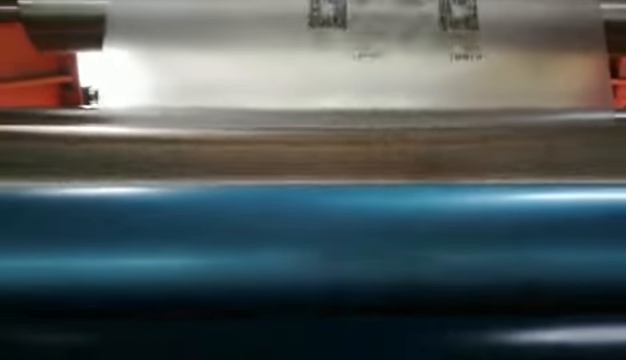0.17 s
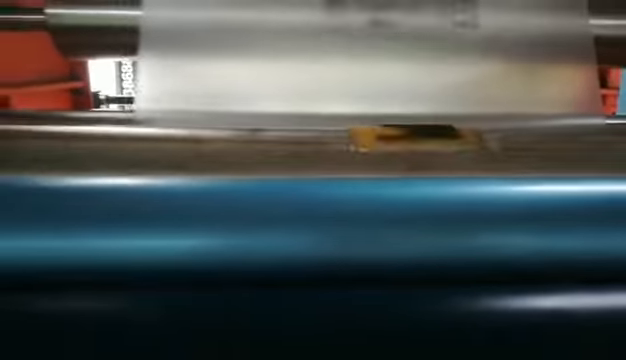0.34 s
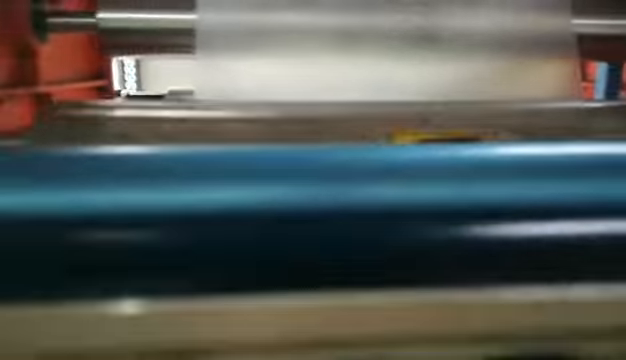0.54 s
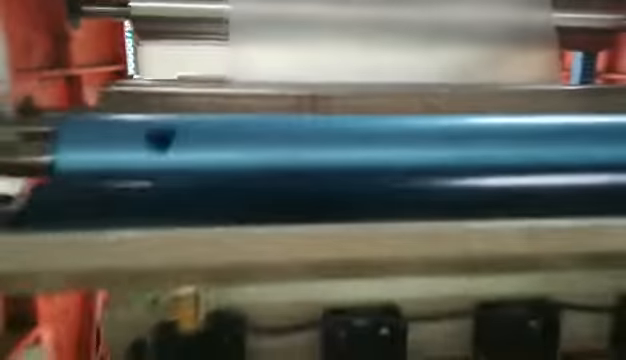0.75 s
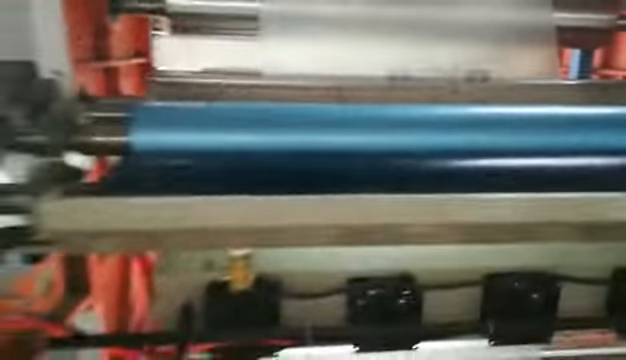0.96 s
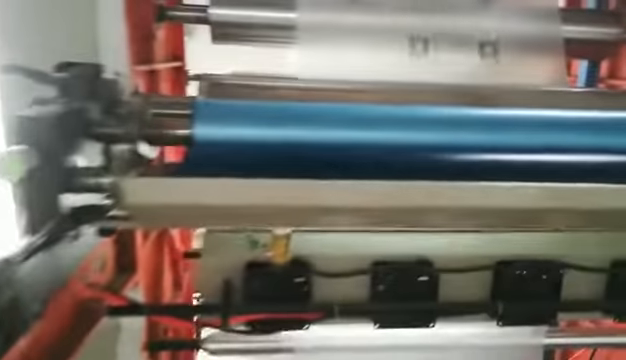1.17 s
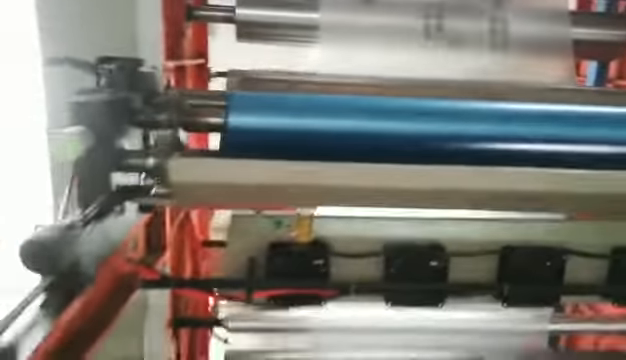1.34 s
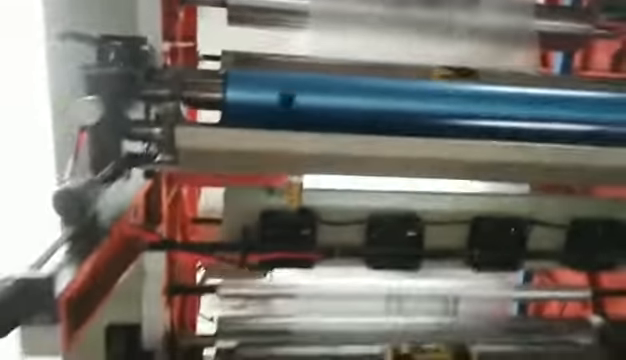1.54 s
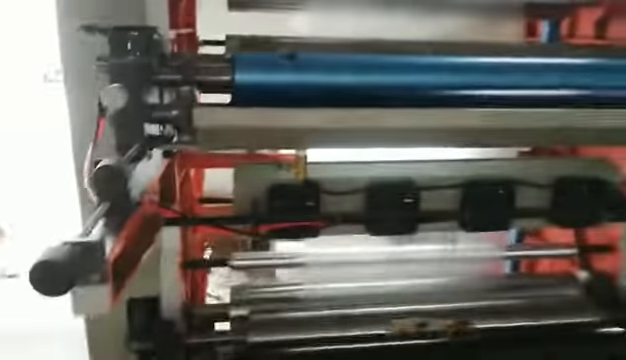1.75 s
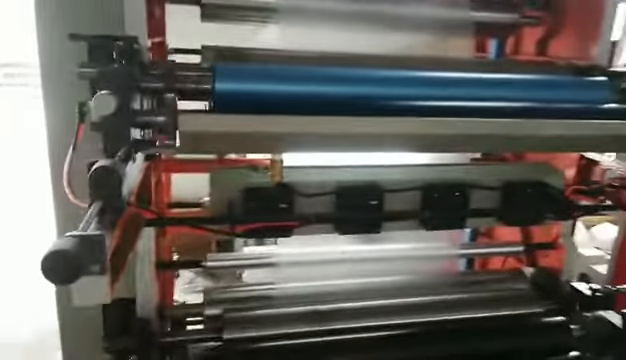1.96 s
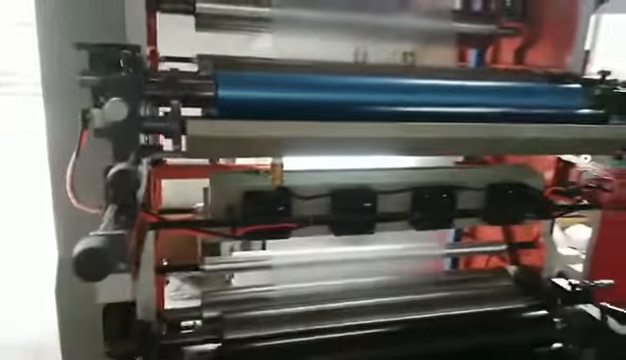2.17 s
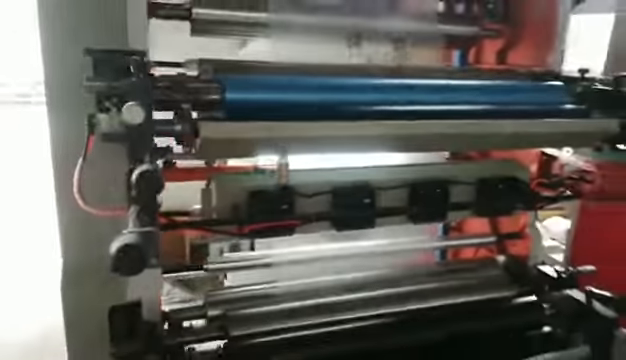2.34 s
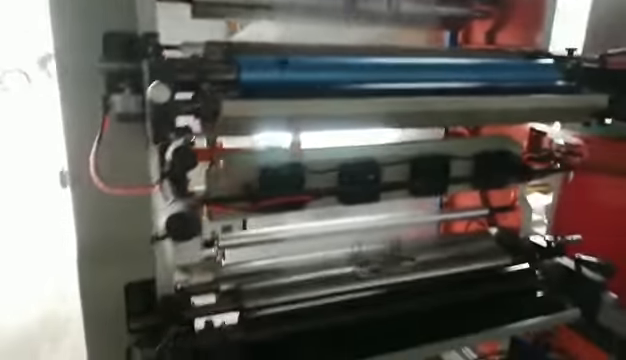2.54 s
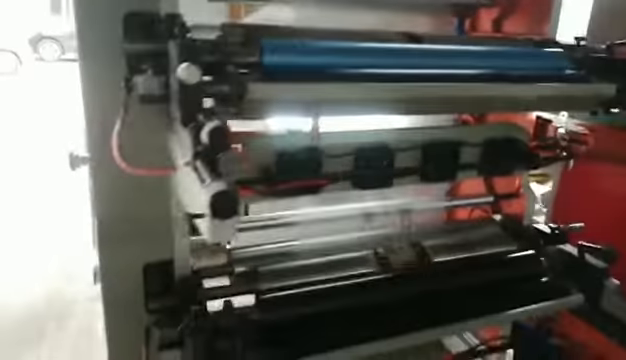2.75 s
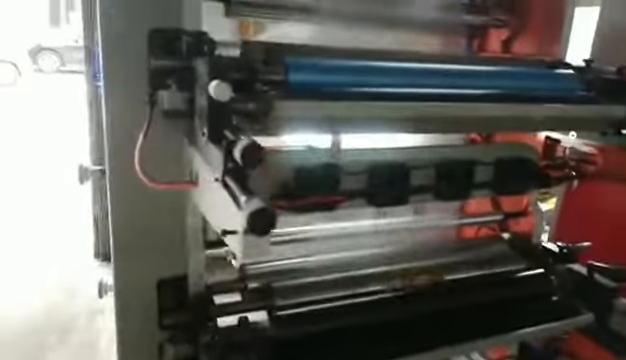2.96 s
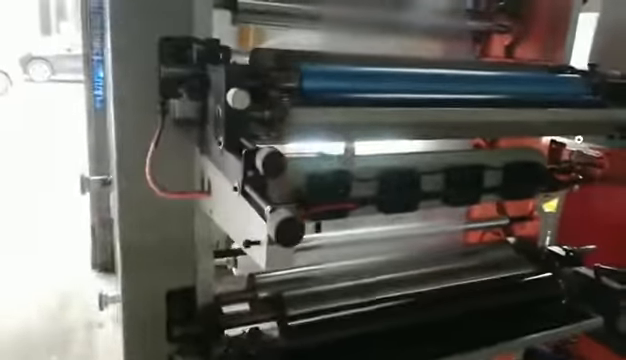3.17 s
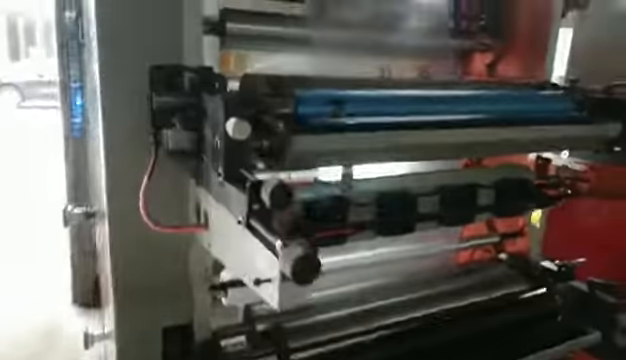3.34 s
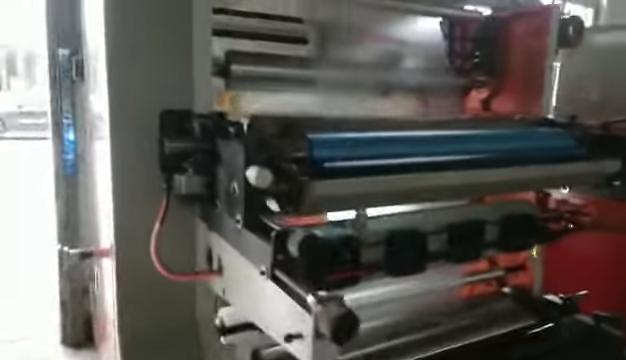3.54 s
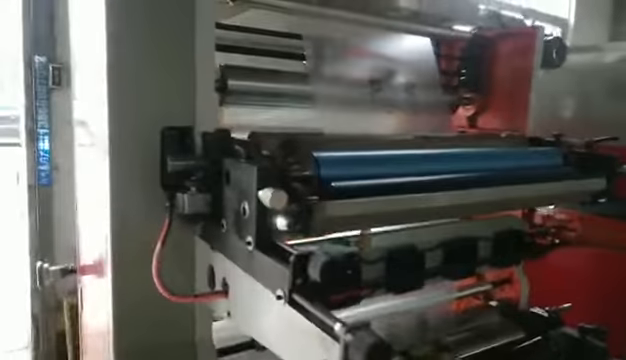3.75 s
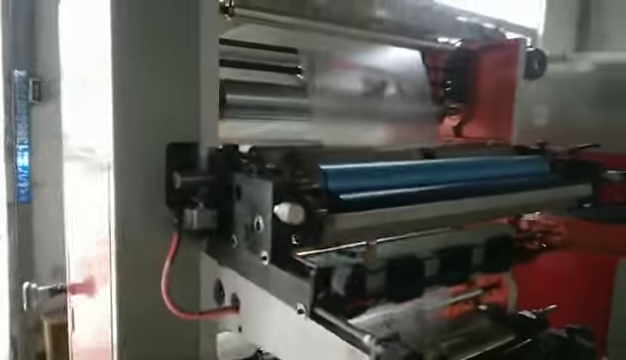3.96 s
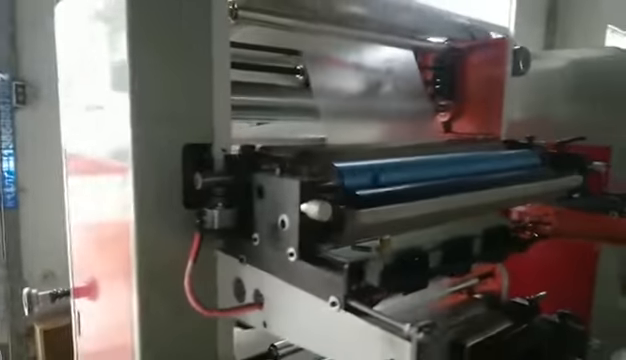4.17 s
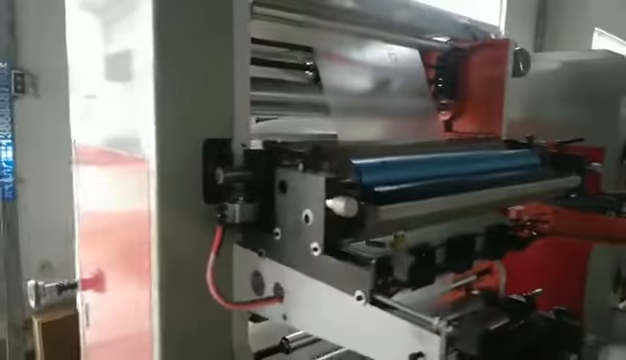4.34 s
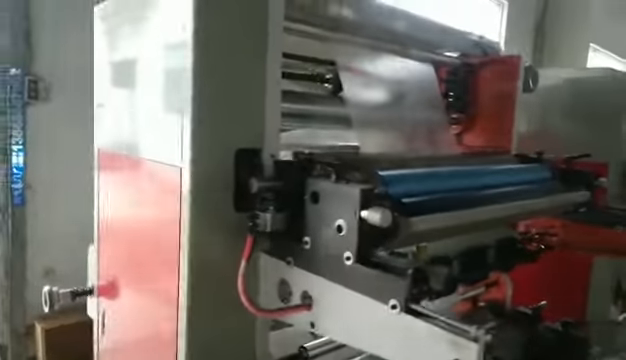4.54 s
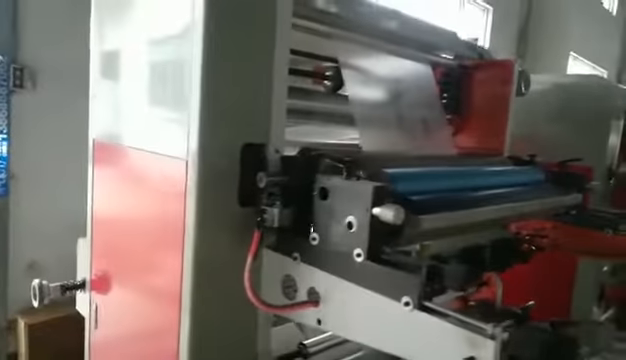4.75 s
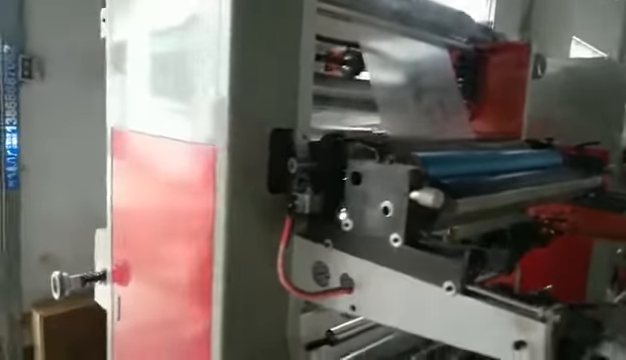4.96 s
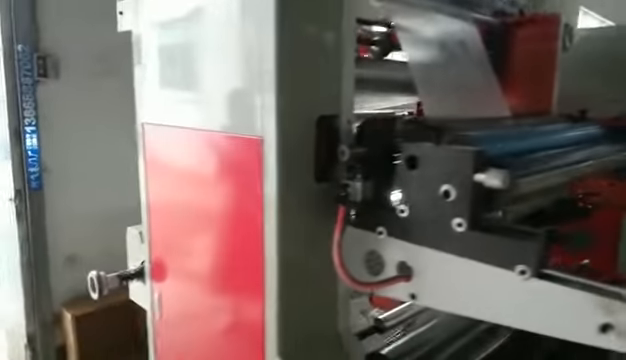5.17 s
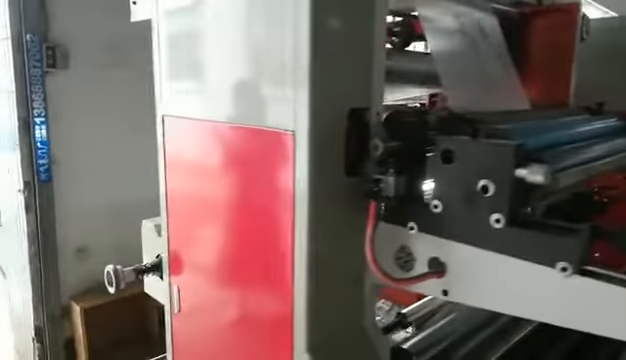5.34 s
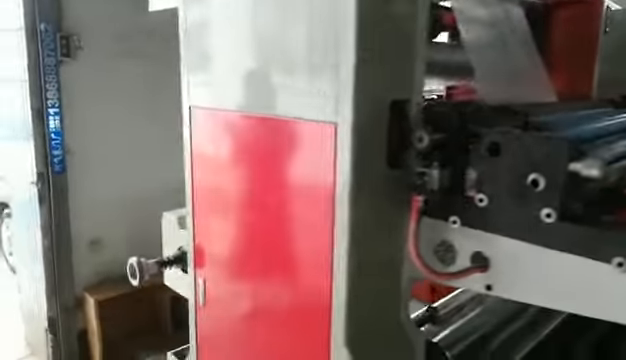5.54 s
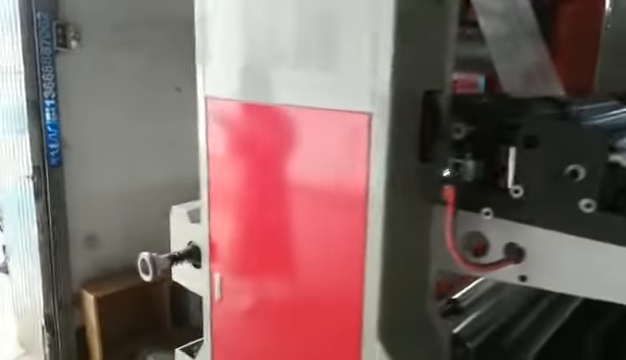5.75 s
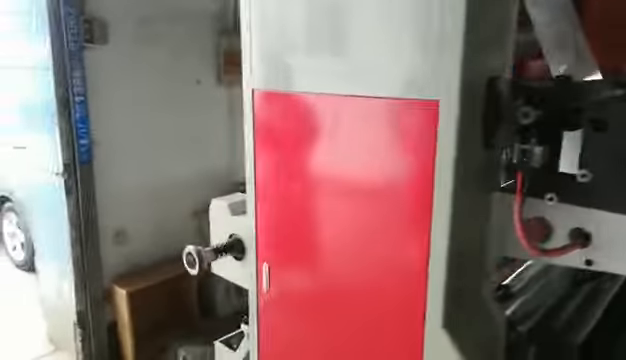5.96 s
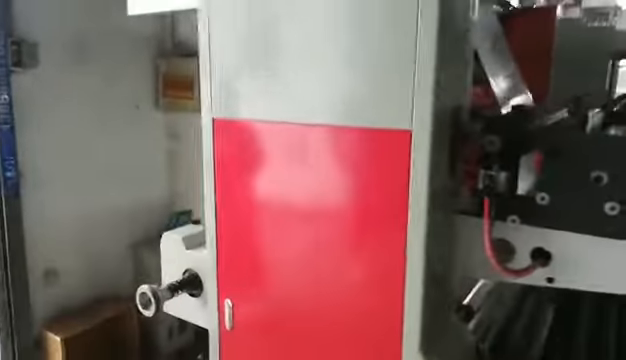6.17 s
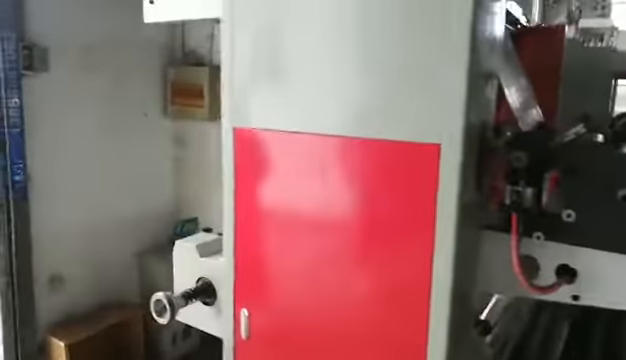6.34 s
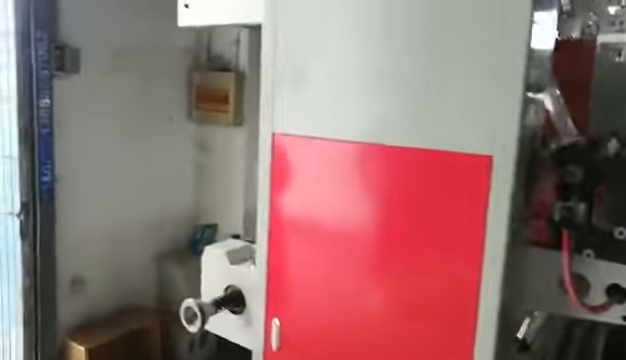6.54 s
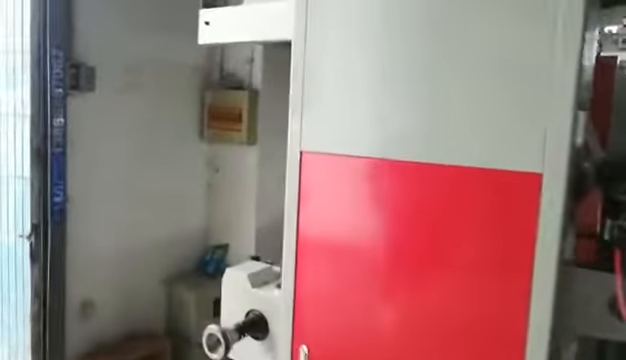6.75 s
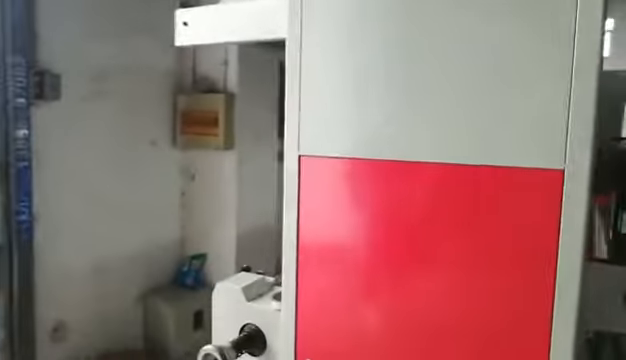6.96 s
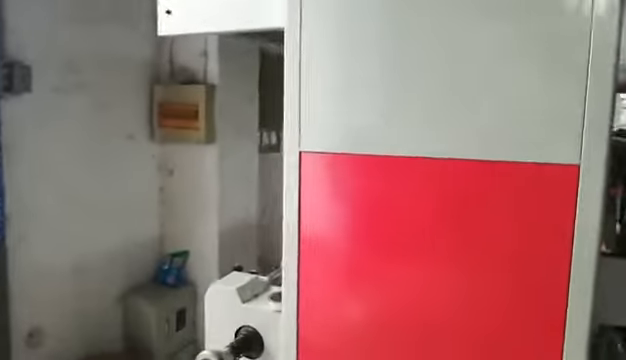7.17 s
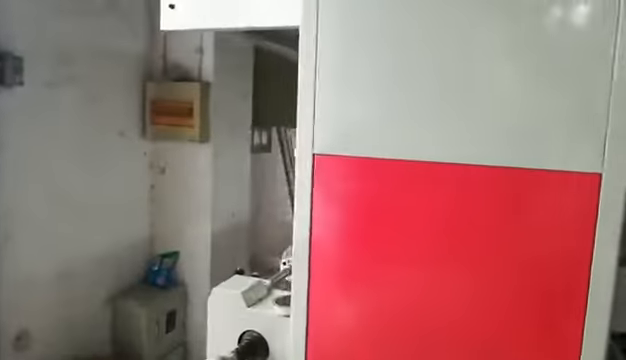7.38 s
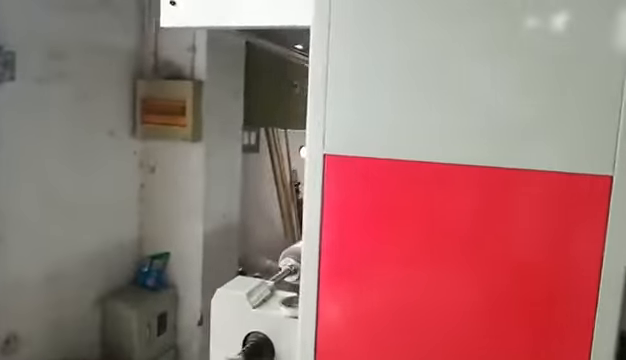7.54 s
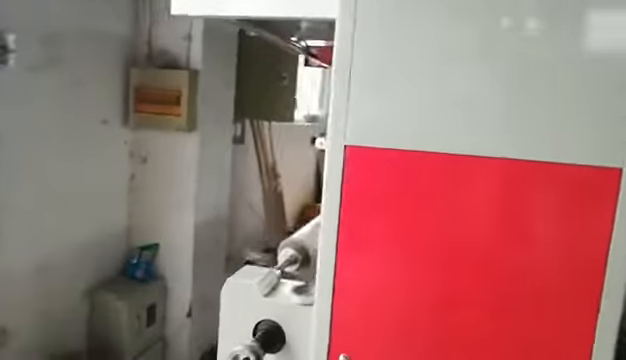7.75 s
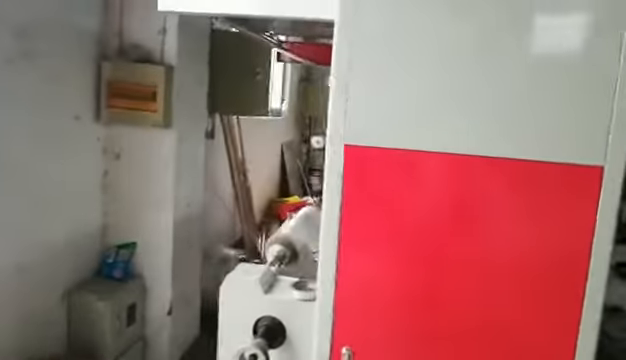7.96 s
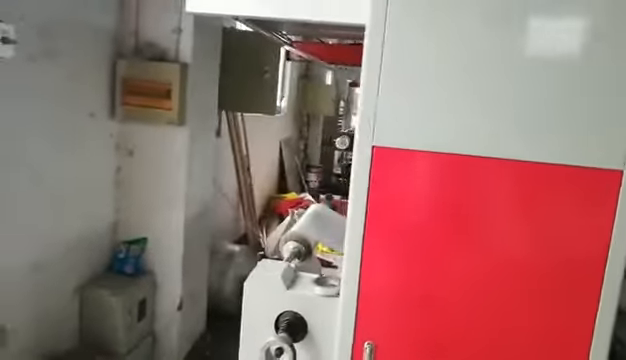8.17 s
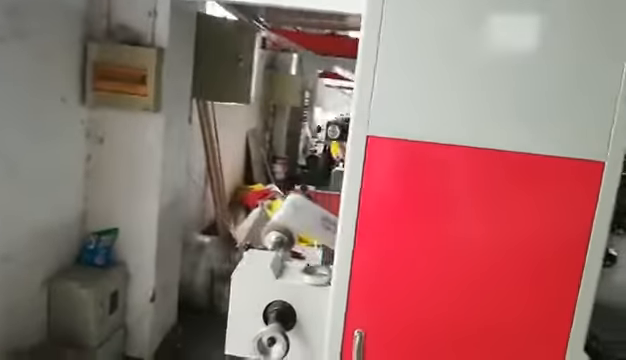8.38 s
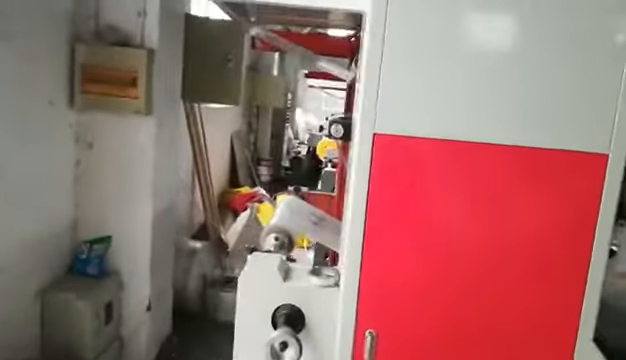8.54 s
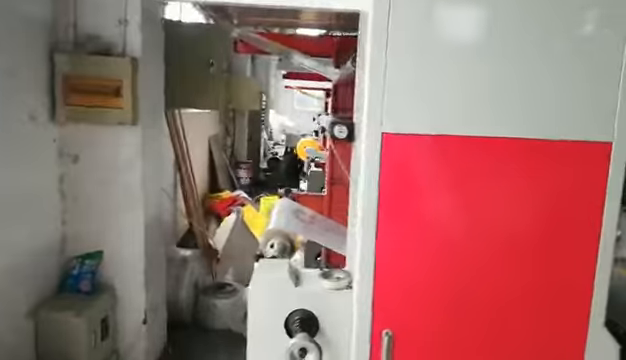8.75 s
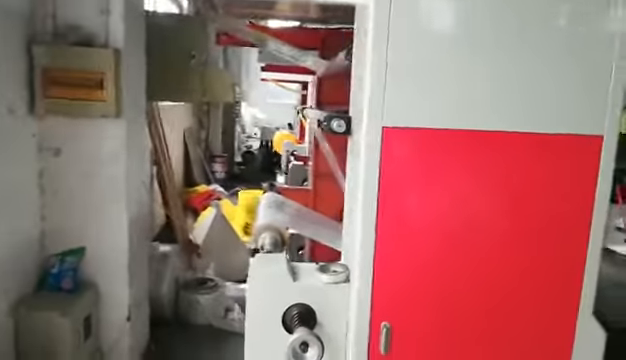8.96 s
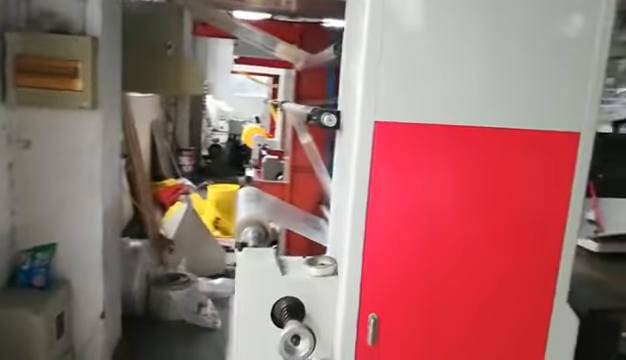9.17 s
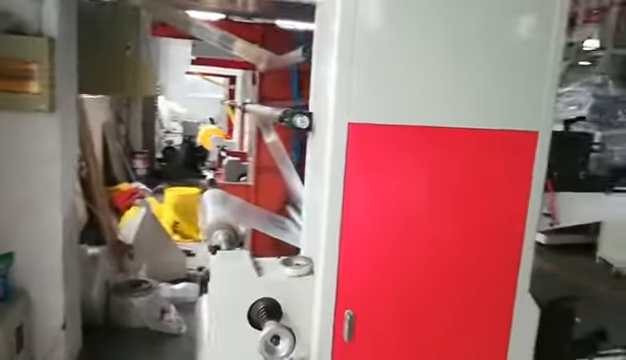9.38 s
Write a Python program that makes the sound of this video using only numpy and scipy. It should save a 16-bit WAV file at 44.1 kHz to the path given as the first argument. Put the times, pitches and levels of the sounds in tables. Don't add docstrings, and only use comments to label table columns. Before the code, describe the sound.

From 0 s a web printing machine runs close by in a reflective workshop: a wide, dense roar of fans, gears and film over a clean bass hum around 110 and 166 Hz, swaying about once a second. A thin whine near 2 kHz wavers in level and side, with faint fuzzy fan whistles above. Over 0-3 s the handheld stereo microphone backs away and the roar drops a few decibels, its colour shifting with reflections while hum notes swell and dip. Brief bearing squeaks come at 3.3 s and, loudest, 4.3 s. A short, thin far horn sounds at 4.7 s for about 0.3 s. More squeaks follow at 5.9, 6.4, 7.0 and 7.2 s, mostly right. Around 6.2 s a cabinet shades the roar, dulling the left and deepening the bass. A last faint squeak comes at 8.5 s; the machine continues to 9.4 s, slightly fuller. Treble is cut off and grainy.

```python
import sys
import numpy as np
from scipy import signal
from scipy.fft import dct
from scipy.io import wavfile
from scipy.ndimage import uniform_filter1d

SR = 44100
rng = np.random.default_rng(int(sys.argv[2]) if len(sys.argv) > 2 else 0)


def dump_mix(stems):
    frames = np.atleast_2d(stems).T
    limited = np.clip(frames, -1, 1)
    pcm = np.round(limited * 32767).astype(np.int16)
    wavfile.write(sys.argv[1], SR, pcm)


def invert_db(level):
    return 10 ** (np.asarray(level, dtype=float) / 20)


N = 414981


def evened(x):
    return x / np.sqrt(np.mean(x ** 2) + 1e-20)


def follow(rows, t):
    s, *columns = np.transpose(rows)
    return np.array([np.interp(t, s, c) for c in columns])


def colour(rows, hz):
    rows = np.array(rows, float)
    return follow(np.column_stack([np.log(rows[:, 0]), rows[:, 1:]]), np.log(hz + 1))


def tone(hz):
    turns = np.cumsum(hz * np.ones(N)) / SR + rng.random()
    return np.sqrt(2) * np.sin(2 * np.pi * turns)


def drift(per_s):
    width = round(SR / 64 / per_s) + 1
    coarse = rng.standard_normal(N // 64 + 2)
    coarse = uniform_filter1d(uniform_filter1d(coarse, width), width)
    return np.interp(np.arange(N) / 64, np.arange(len(coarse)), evened(coarse))


def swells(rows, heights):
    out = np.zeros(N, np.result_type(heights))
    for (s, long, *_), height in zip(rows, heights):
        start = max(round((s - long / 2) * SR), 0)
        stop = min(round((s + long / 2) * SR), N)
        at = np.arange(start, stop)
        out[at] += height * np.cos(np.pi * (at / SR - s) / long) ** 2
    return out


# Hz, left facing, right facing, left shaded, right shaded, all in dB per Hz.
ROAR_DB = [(25.3, -17, -17.5, -8, -9), (59, -14, -13.5, 6, 11.5), (244, 3, 2, 1, 4),
           (425, -0.5, 0.5, -4.5, -4), (630, -2.5, 2.5, -4, -2), (1036, -1.5, 0, -3.5, -2.5),
           (1737, -2, -1.55, -12, -1.5), (2177, -4.5, -6.5, -13.5, -5.0), (2876, -15.5, -9.5, -12.5, -11.5),
           (3666, -9, -7.6, -16, -7), (5500, -9, -11, -16.5, -14), (6205, -10.5, -0.5, -18.5, -6),
           (6730, -9.5, 1, -14, -2.5), (7430, -12.5, -8.5, -19.5, -11)]
# time in seconds, level of the roar's body in dB.
WALK_DB = [(0, -28.5), (.8, -29.5), (1.4, -30.5), (2.5, -31.5), (3, -31), (5, -31.5), (5.97, -32.5),
           (6.24, -34), (7.6, -34), (9.1, -34), (9.41, -32.5)]
# low edge in Hz, high edge in Hz.
PARTS_HZ = [
    (300, 1900),
    (20, 95),
    (2100, 5500),
    (5500, 7500),
]
# level at mid walk in dB, share of the walk followed 0-1, wander in dB.
PART_LEVELS = [
    (-41, .1, 1.5),
    (-37, .95, .5),
    (-37.5, 1, 0.3),
]
# time in seconds, share of the machine hidden 0-1.
CABINET_SHADE = [
    (0, 0.11),
    (6.05, 0.05),
    (6.3, 1),
    (9.41, 0.82),
]
# Hz, likeness 0-1, lead of the left in radians.
PORT_LIKENESS = [(29.8, 0.97, -0.62), (61, 0.98, 0.11), (253, .92, -.2), (432, 0.53, -.8), (580, .35, -1.2),
                 (784, .14, -0.29), (937, .28, -0.16), (1063, 0.61, -0.59), (1663, 0.59, 0.37),
                 (1803, 0.03, 0.15), (7500, 0.04, 0.65)]
# start in seconds, length in seconds, start Hz, end Hz, level in dB.
ECHOES = [(0.8, 2.4, 1480, 1730, 4), (0, 2.3, 620, 630, 3.5), (-1.1, 2.9, 400, 520, 2.5),
          (0.56, 1.6, 680, 900, -7), (3.5, 0.91, 520, 460, -6.5), (2, 4.1, 390, 460, -4),
          (3, 1.6, 600, 820, 2), (5, 2.9, 325, 335, 7), (5.5, 0.86, 820, 710, 7), (7, 3.4, 690, 720, -6),
          (4.5, 2, 400, 490, -4), (8, 2.3, 160, 360, -11), (10, 1.3, 3300, 3400, 0)]
MID_WALK_DB = -31.5
ECHO_WIDTH = 0.068


def roar():
    frames, hz = N // 256 + 5, np.fft.rfftfreq(1024, 1 / SR)[:184]
    t = np.arange(frames) * 256 / SR
    a, b, c, d, left_patch, right_patch, gust = rng.standard_normal((frames, len(hz), 7)).T

    facing_l, facing_r, shaded_l, shaded_r = colour(ROAR_DB, hz)[:, :, None]
    shade = np.clip(follow(CABINET_SHADE, t), 0, 1)
    left_db = facing_l + shade * (shaded_l - facing_l)
    right_db = facing_r + shade * (shaded_r - facing_r)
    ports = invert_db([left_db, right_db])
    same, lead = colour(PORT_LIKENESS, hz)[:, :, None]
    same = np.clip(same, 0, 1)
    cross = 2 * same * np.cos(lead) * ports[0] * ports[1]
    middle = (ports[0] ** 2 + ports[1] ** 2 + cross) / 4

    body_db = follow(WALK_DB, t)[0]
    wanted_db = [body_db]
    for db, part, wander_db in PART_LEVELS:
        wander = drift(3)[::256].take(range(frames), mode="clip")
        wanted_db.append(db + part * (body_db - MID_WALK_DB) + wander_db * wander)
    has_db = np.array([10 * np.log10(middle[(hz > lo) & (hz < hi)].sum(0)) for lo, hi in PARTS_HZ])
    share = colour([(70, 0, 1, 0, 0), (300, 1, 0, 0, 0), (1700, 1, 0, 0, 0),
                    (2300, 0, 0, 1, 0), (5200, 0, 0, 1, 0), (5900, 0, 0, 0, 1)], hz)
    level_db = share.T @ (np.array(wanted_db) - has_db) + 1.57

    for s, long, start_hz, end_hz, db in ECHOES:
        part = np.clip((t - s) / long, 0, 1)
        centre_hz = start_hz + part * (end_hz - start_hz)
        rise = np.sqrt(np.sin(np.pi * part).clip(0))
        level_db += db * rise * np.exp(-((hz[:, None] - centre_hz) / (ECHO_WIDTH * centre_hz)) ** 2)

    gust = evened(uniform_filter1d(uniform_filter1d(gust, 25, 1), 90, 0))
    patches = []
    for patch in (left_patch, right_patch):
        smooth = uniform_filter1d(uniform_filter1d(patch + left_patch, 11, 1), 3, 0)
        patches.append(evened(smooth))
    patchy_db = 1.2 * np.clip(hz / 600, 0, 1)[:, None]
    left = a + 1j * b
    right = same * np.exp(-1j * lead) * left + np.sqrt(1 - same ** 2) * (c + 1j * d)
    z = np.array([left, right])
    z *= ports * invert_db(level_db + 0.59 * gust + patchy_db * np.array(patches))
    z = np.pad(z, ((0, 0), (0, 513 - len(hz)), (0, 0)))
    return signal.istft(z, nperseg=1024, noverlap=768)[1][:, :N]


# time in seconds, level in dB.
ORDER_4_DB = [(0, -35), (.2, -27.5), (.55, -32), (1.24, -31.5), (1.75, -30.5), (2.04, -37.5), (2.6, -29),
              (3.25, -36.5), (3.6, -30.5), (4.25, -37.5), (4.7, -31.5), (5.45, -35), (5.95, -32.5),
              (6.5, -33), (6.73, -41.5), (6.9, -32.5), (7.6, -35), (9.41, -41.5)]
# time in seconds, level in dB.
ORDER_6_DB = [(0, -25), (.4, -27), (.55, -33.5), (.85, -32), (1.24, -31.5), (1.8, -38), (2.75, -33.5),
              (2.97, -45), (3.3, -37), (3.9, -35.5), (4.2, -39.5), (4.5, -32), (5.3, -49), (5.75, -36.5),
              (7.4, -41), (7.68, -52), (8.1, -38.5), (9.41, -37.5)]
# Hz, rise in Hz per second, level between crests in dB.
WEAK_TONES = [
    (50, 2.1, -50),
    (137, 0, -54),
    (221, 0, -50),
    (236, 0, -46),
]
# middle in seconds, length in
# seconds, level in dB.
WEAK_CRESTS = [
    [(2.7, 1.5, -41), (3.5, .6, -40.5), (3.95, 0.54, -35), (4.75, 1.3, -40), (5.7, .9, -41.5),
     (6.5, 0.67, -48), (7.6, 0.6, -42)],
    [(.5, .5, -42), (1, 0.42, -38), (2, 0.41, -42), (4.6, 1, -43.5), (5.2, 0.46, -43), (6.7, 0.37, -39.5),
     (7.9, 0.7, -38), (8.55, 0.7, -34), (9.2, 0.68, -42)],
    [(.75, .5, -43), (1.75, 0.87, -44), (2.65, .7, -37.5), (3.2, 0.61, -41.5), (3.7, 0.7, -40),
     (4.45, 1.45, -38.5), (5.5, .8, -41.5), (6.7, 0.56, -41.5), (8.55, 0.69, -39.5)],
    [(1.25, 0.5, -40), (2.25, 2.3, -44), (3.95, 0.44, -39), (4.45, 0.92, -42.5), (5.5, 1.9, -47.5),
     (7.4, .5, -46), (8.7, 2.4, -45.5), (9.41, 0.42, -39.5)],
]
# Hz, level in dB.
FAINT_TONES = [(82.8, -55), (276, -53), (331, -57), (431, -50), (580, -49), (750, -51)]
ORDER_4_HZ, ORDER_6_HZ = 109.8, 166
ROLLER_PER_S, ROLLER_SWAY = 0.97, .0011
FAINT_FADE_DB_PER_S = 1.3


def hum(t):
    speed = 1 + ROLLER_SWAY * (np.sin(2 * np.pi * ROLLER_PER_S * t) + 0.68 * drift(2.3))
    levels = [(ORDER_4_HZ, invert_db(follow(ORDER_4_DB, t)[0])), (ORDER_6_HZ, invert_db(follow(ORDER_6_DB, t)[0]))]
    for (hz, rise_hz, rest_db), rows in zip(WEAK_TONES, WEAK_CRESTS):
        crests = swells(rows, invert_db([db for *_, db in rows]))
        levels.append((hz + rise_hz * t, invert_db(rest_db) + crests))
    total = np.zeros(N)
    for hz, level in levels:
        total += level * invert_db(0.66 * drift(16)) * tone(hz * speed)
    for hz, db in FAINT_TONES:
        total += invert_db(db - FAINT_FADE_DB_PER_S * t + 3 * drift(1.5)) * tone(hz * speed)
    across_s = .00008 + .00008 * drift(.7)
    return np.array([np.interp(t + side * across_s, t, total) for side in (1, -1)])


# middle in seconds, length in seconds, left in dB,
# right in dB, lead of the left in radians.
WHINE_PATHS = [(0, .5, -35, -45, .3), (.3, .5, -38, -43, .9), (.65, .5, -44, -39, .5),
               (1, .7, -40, -35, 1.2), (1.25, .45, -46, -38, .4), (1.44, .4, -38, -43, 0),
               (1.88, .5, -45, -39, 3), (2.24, .45, -42, -46, 1.6), (2.76, .4, -54, -42, -.5),
               (3.02, .4, -45, -44, .5), (3.38, .5, -45, -46, .4), (3.72, .5, -48, -39, 2.4),
               (4.27, .6, -44, -43, -1.2), (4.68, .7, -43, -52, -1.4), (5, .35, -52, -45, -1.4),
               (5.36, .5, -49, -43, -1.5), (5.6, .4, -45, -47, 2.3), (6.3, .4, -52, -46, -2.4),
               (6.78, .7, -47, -42, -2.6), (7.22, .5, -47, -41, -2.2), (7.58, .45, -48, -36, -1.8),
               (8.25, .7, -53, -44, -2.4), (8.75, .7, -45, -56, .6), (9.3, .8, -57, -39, 2.9)]
WHINE_HZ = 2029.3
WHINE_REST_DB = -55


def whine(t):
    _, _, left_db, right_db, lead = np.transpose(WHINE_PATHS)
    left = swells(WHINE_PATHS, invert_db(left_db) * np.exp(1j * lead))
    right = swells(WHINE_PATHS, invert_db(right_db))
    scatter = np.array([drift(4.7) + 1j * drift(6), drift(6) + 1j * drift(4.8)]) / 2
    paths = np.array([left, right]) + invert_db(WHINE_REST_DB) * scatter
    turn = 2 * np.pi * np.cumsum(WHINE_HZ + .5 * drift(7)) / SR
    flutter_db = 2.4 + 1.2 * np.array([drift(16), drift(16)])
    return np.sqrt(2) * invert_db(flutter_db) * (paths * np.exp(1j * turn)).imag


# Hz, width in Hz, left in dB, right in dB.
FAN_WHISTLES = [
    (6741, 24, -56, -48),
    (4059, 12, -62, -60),
    (6250, 60, -62, -54),
]


def fan_tones(t):
    out = np.zeros((2, N))
    walk_db = follow(WALK_DB, t)[0]
    for hz, width, *db in FAN_WHISTLES:
        for port, port_db in zip(out, db):
            wander = drift(width) + 1j * drift(width)
            level = invert_db(port_db + walk_db - walk_db.mean())
            port += level * (wander * np.exp(2j * np.pi * hz * t)).real
    return out


# start in seconds, length in seconds, Hz, left in dB, right in dB.
BEARING_CHIRPS = [
    (3.27, 0.15, 2340, -41, -43),
    (4.269, 0.12, 1920, -39, -30),
    (5.86, 0.13, 2100, -43, -37),
    (6.44, 0.14, 2185, -60, -36),
    (6.446, 0.11, 3680, -58.5, -43),
    (7.152, 0.091, 3320, -57, -41),
    (8.5, .12, 4330, -58, -48),
    (6.997, 0.073, 3660, -64, -47),
]


def chirps(t):
    out, waver_hz = np.zeros((2, N)), 12 * drift(30)
    for s, long, hz, *db in BEARING_CHIRPS:
        on = (t > s) & (t < s + long)
        swell = np.sin(np.pi * (t[on] - s) / long) ** 2
        squeak = np.sqrt(2) * np.sin(2 * np.pi * np.cumsum(hz + waver_hz[on]) / SR)
        out[:, on] += invert_db(db)[:, None] * swell * squeak
    return out


# multiple of the pitch, left in dB, right in dB, fade in dB per second.
HORN_PARTIALS = [
    (4, -52, -38.5, 28),
    (5, -50, -38.5, 4),
]
HORN_S, HORN_LONG_S, HORN_HZ = 4.73, .28, 790


def horn(t):
    age = np.maximum(t - HORN_S, 0)
    tail = invert_db(-250 * np.maximum(age - HORN_LONG_S, 0))
    pressed = np.clip(age / 0.015, 0, 1) * tail
    hz = HORN_HZ * (1 - .004 * np.minimum(age, 1) + .0012 * drift(25))
    out = np.zeros((2, N))
    for k, *db, fade_db in HORN_PARTIALS:
        out += invert_db(db)[:, None] * invert_db(2.2 * drift(40) - fade_db * age) * pressed * tone(k * hz)
    return out


def scene():
    t = np.arange(N) / SR
    return roar() + hum(t) + whine(t) + fan_tones(t) + chirps(t) + horn(t)


ROUNDING_BANDS = np.cumsum([4] * 10 + [8] * 7 + [12] * 4 + [16] * 2 + [20] * 2 + [24] * 2 + [28] * 2 + [32] * 3)
# Hz, dB over the masking level.
ROUNDING_STEP_DB = [(150, -22), (450, -3), (1500, 2), (2500, 4.5), (5000, 4.2), (6300, 2), (7400, 5.5)]
# Hz, side level hidden in dB.
SIDE_MASK_DB = [(100, 15), (300, 8), (600, -4), (1100, 2), (2000, -2)]
ROUNDING_HOP = 940


def mid_side(pair, joint):
    return np.where(joint, [pair[0] + pair[1], pair[0] - pair[1]] / np.sqrt(2), pair)


def band_holes(x):
    hop, half = ROUNDING_HOP, ROUNDING_HOP // 2
    count = N // hop + 2
    padded = np.pad(x, ((0, 0), (hop, (count + 1) * hop - N - hop))).reshape(2, -1, hop)
    window = np.sin(np.pi * (np.arange(2 * hop) + .5) / (2 * hop))
    blocks = np.concatenate([padded[:, :-1], padded[:, 1:]], 2) * window
    a, b, c, d = np.split(blocks, 4, axis=2)
    lines = dct(np.concatenate([-c[..., ::-1] - d, a - b[..., ::-1]], 2), type=4, norm="ortho")

    starts = np.r_[0, ROUNDING_BANDS]
    band = np.searchsorted(ROUNDING_BANDS, np.arange(hop), side="right")
    joint_band = (rng.random((count, len(starts))) < .7) | (starts < 16)
    joint = joint_band[:, band]
    lines = mid_side(lines, joint)

    power = np.add.reduceat(lines ** 2, starts, axis=2) / np.diff(np.r_[starts, hop])
    spread = np.exp(uniform_filter1d(np.log(power + 1e-20), size=5, axis=2))
    masking = np.sqrt(.7 * power + .3 * spread)
    from_mid = invert_db(colour(SIDE_MASK_DB, starts * SR / 2 / hop)[0]) * masking[0]
    masking[1] = np.where(joint_band, np.maximum(masking[1], from_mid), masking[1])
    thrift_db = 2.6 * evened(uniform_filter1d(rng.standard_normal(power.shape), size=2, axis=1))
    fine_db = colour(ROUNDING_STEP_DB, np.arange(hop) * SR / 2 / hop)[0]
    step = (masking * invert_db(thrift_db))[..., band] * invert_db(fine_db) + 1e-9
    rounded = np.sign(lines) * np.floor(abs(lines) / step + .41) * step

    folded = dct(mid_side(rounded, joint), type=4, norm="ortho")
    u, v = folded[..., :half], folded[..., half:]
    blocks = np.concatenate([v, -v[..., ::-1], -u[..., ::-1], -u], 2) * window
    first, second = np.split(blocks, 2, axis=2)
    return (first[:, 1:] + second[:, :-1]).reshape(2, -1)[:, :N]


def band_limit(x):
    return signal.sosfilt(signal.butter(12, 8500, fs=SR, output="sos"), x)


EDGE_HZ = 7511


def record(dry):
    edge = signal.firwin(1023, EDGE_HZ, window=("kaiser", 9), fs=SR)
    mix = signal.oaconvolve(band_holes(dry), edge[None], "same")
    return band_limit(mix)


dry = scene()
out = record(dry)
dump_mix(out)
```